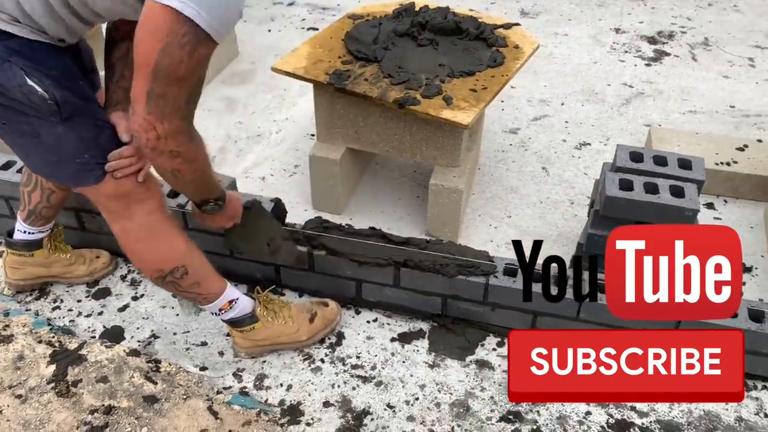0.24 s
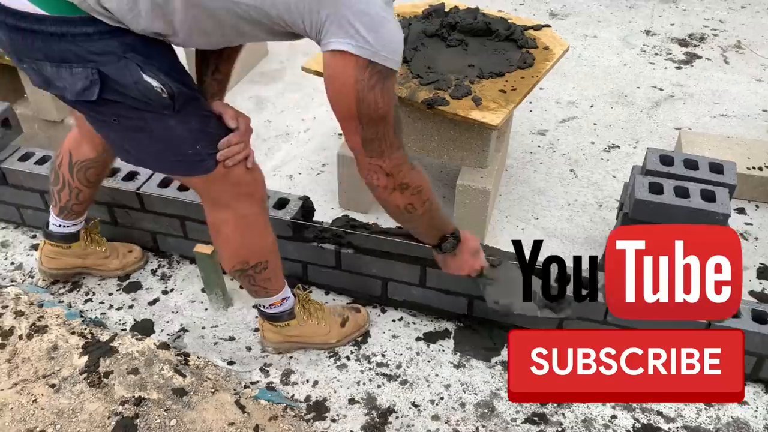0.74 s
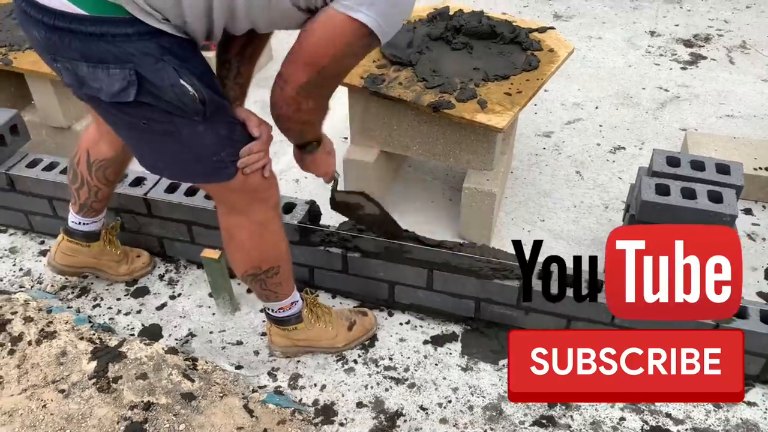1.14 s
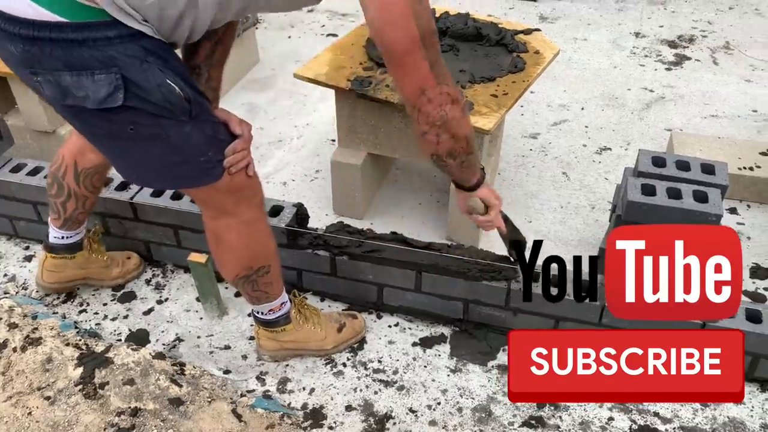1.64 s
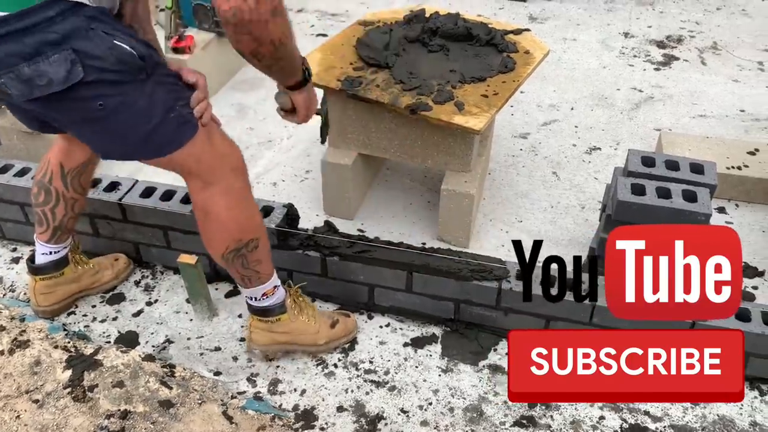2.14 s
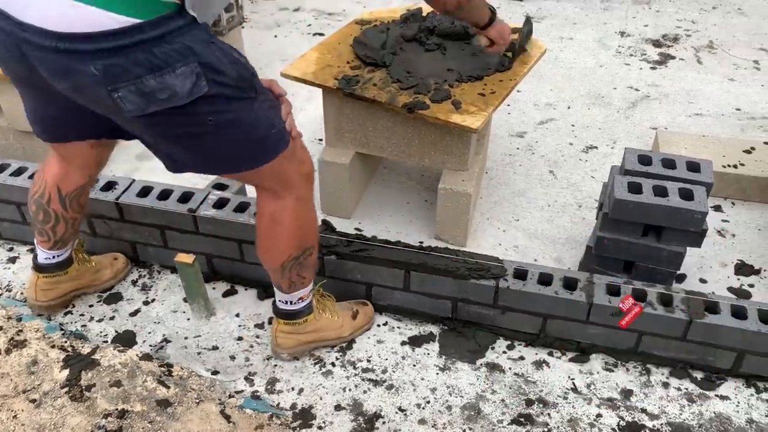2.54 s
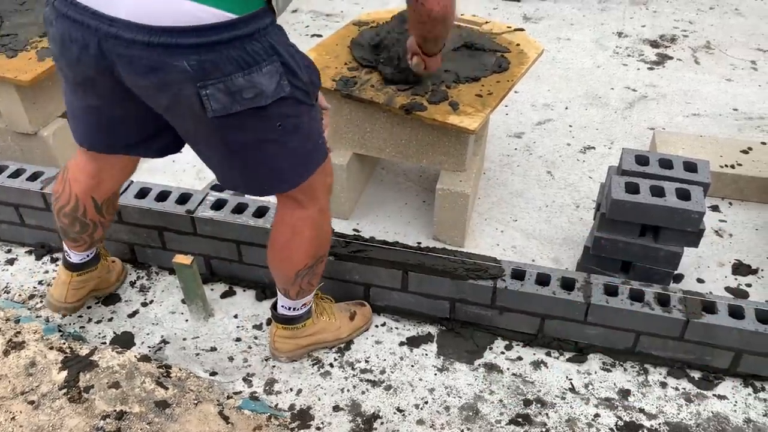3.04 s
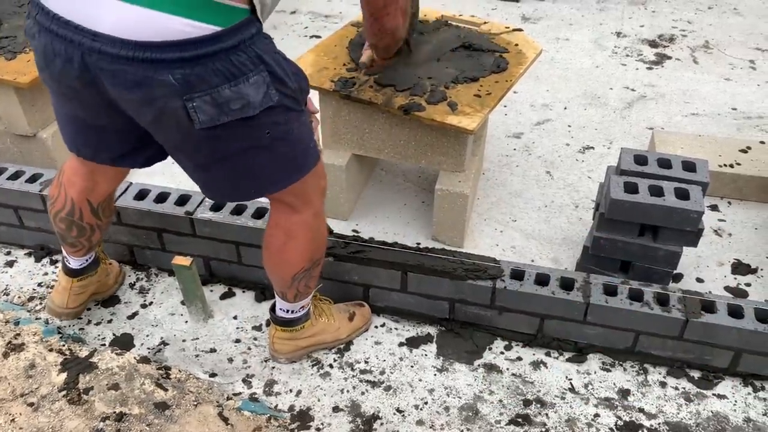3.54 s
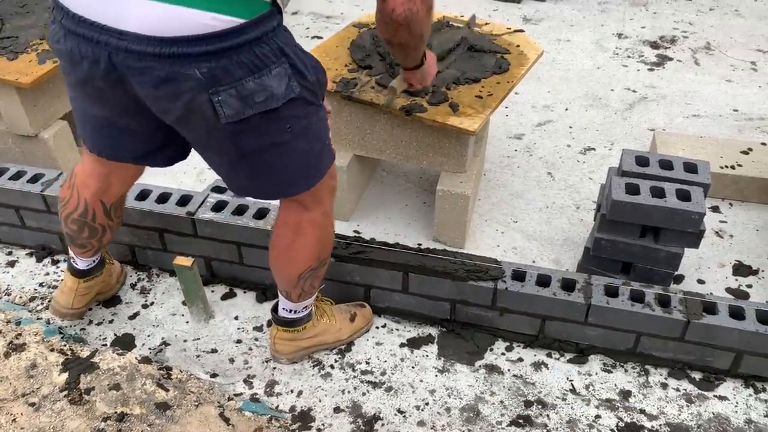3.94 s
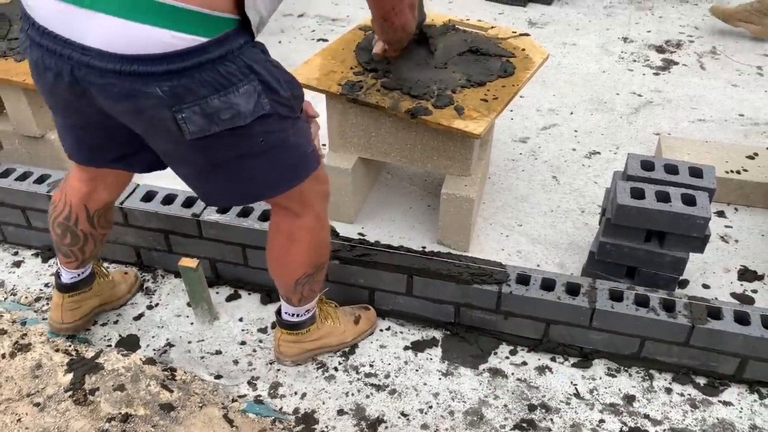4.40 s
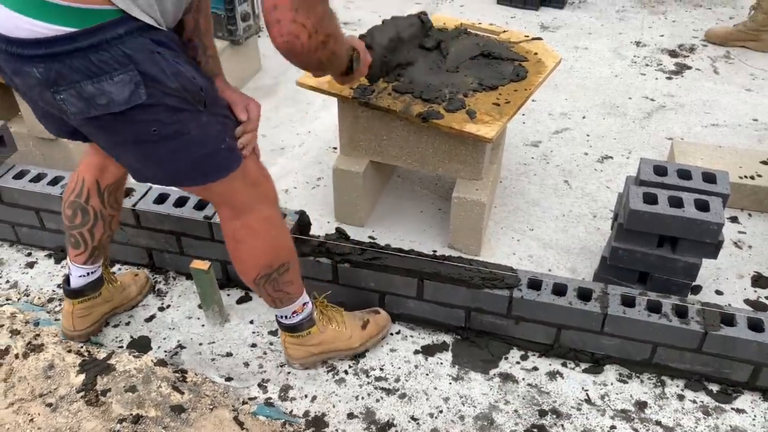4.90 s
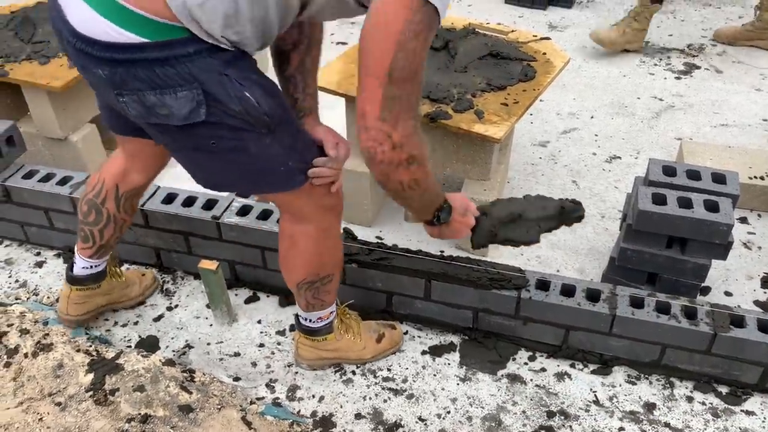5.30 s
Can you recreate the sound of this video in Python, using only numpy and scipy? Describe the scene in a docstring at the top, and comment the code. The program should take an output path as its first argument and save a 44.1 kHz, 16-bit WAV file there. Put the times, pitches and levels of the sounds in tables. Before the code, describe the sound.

A low engine hum, gently wavering, lies under soft airy noise throughout, swelling a little in the middle and easing by about 4.5 s. Faint crumb clicks open the scene. From 0.26 to 0.6 s a steel trowel spreads and drags mortar over concrete block: gritty, stuttering, ringing, with a gliding squeal and hard stony ticks. About a second of near quiet follows. At 1.56 to 1.9 s come fast, bright, harsh strokes, ending with a wet slap. At 2.5 s a hollow thud on the board begins duller turning scrapes until 2.95 s. Sharp scoops rasp and squeal at 3.2 to 3.3 s and briefly at 4.05 to 4.15 s. Between and after them are soft slides, crumb ticks and a small dull thud near 3.7 s. Late on, deep boot bumps and dropping crumbs end with a soft rub around 5.3 s. The work is close, with faint outdoor reflections.

```python
"""An engine hums on an open site throughout, as wavering tones over noise; crumbs click and soft slides rub.
From 0.26 s a bricklayer spreads and drags mortar along concrete blocks: sand grains crack under a ringing
blade, and from 0.30 s narrow and broad squeals glide during the trowel work. From 1.56 s he strikes it off;
surplus slaps down as a struck board and a splat. He turns the heap from 2.51 s and scoops at 3.19 s and 4.05 s;
each push bites in, holds and dies away. From 3.40 s boots add dull bass pulses; late on, crumbs drop."""
import sys
import numpy as np
from scipy import signal
from scipy.fft import rfft, irfft, next_fast_len
from scipy.io import wavfile
from scipy.ndimage import uniform_filter1d

SR = 44100
rng = np.random.default_rng(int(sys.argv[2]) if len(sys.argv) > 2 else 0)


def output_pcm(signal):
    """Save a mono or channel-first signal as 16-bit PCM at the path in sys.argv[1].

    Samples are clipped to [-1, 1] before scaling.
    """
    pcm = np.clip(np.atleast_2d(signal).T, -1, 1) * 32767
    wavfile.write(sys.argv[1], SR, np.round(pcm).astype(np.int16))


N = 245195
TIME = np.arange(N) / SR
BAND_EDGES_HZ = (800, 4500)   # support rumble | grinding edge | loose sand


def from_db(db):
    """Level to amplitude ratio: 20 dB is a factor of ten."""
    return 10 ** (np.asarray(db) / 20)


def rms_one(x):
    """Normalisation to unit root-mean-square."""
    return x / np.sqrt(np.mean(x ** 2) + 1e-20)


def butter(x, hz, kind, order=2):
    """Causal filtering with a maximally flat passband (Butterworth)."""
    return signal.sosfilt(signal.butter(order, hz, kind, fs=SR, output="sos"), x)


def drift(rate, size=N):
    """Random modulation: straight lines between Gaussian knots, `rate` knots a second."""
    knots = np.arange(size) / SR * rate
    return np.interp(knots, np.arange(4096), rng.standard_normal(4096))


def coloured(x, spectrum):
    """Minimum-phase filtering: the cepstrum of a (f/Hz, level/dB) curve is folded to be causal."""
    size = 2 * next_fast_len(x.shape[-1] // 2 + 2048)
    hz, db = np.transpose(spectrum)
    bins_hz = np.arange(size // 2 + 1) * SR / size
    curve_db = np.interp(np.log(bins_hz + 1), np.log(hz), db)
    cepstrum = irfft(np.log(from_db(curve_db)))
    cepstrum[1:size // 2] *= 2
    cepstrum[size // 2 + 1:] = 0
    return irfft(rfft(x, size) * np.exp(rfft(cepstrum)))[..., :x.shape[-1]]


def resonance(x, hz, width_hz):
    """Damped resonance: a two-pole band-pass, whose width sets the decay, with gain 1 on top."""
    r = np.exp(-np.pi * width_hz / SR)
    poles = [1, -2 * r * np.cos(2 * np.pi * hz / SR), r * r]
    return signal.lfilter(np.array([1, 0, -1]) * (1 - r * r) / 2, poles, x)


def burst(t60, size=8192):
    """Exponential decay: noise that falls by 60 dB in t60 seconds."""
    return rng.standard_normal(size) * from_db(-60 * TIME[:size] / t60)


def evened(x, window_s=0.06):
    """Level control: the short-term rms is held at 1 while finer grain remains."""
    return x / np.sqrt(np.abs(uniform_filter1d(x ** 2, round(window_s * SR))) + 1e-20)


def add(out, s, x):
    """Superposition: mix x into out from time s on."""
    start = round(s * SR)
    out[..., start:start + x.shape[-1]] += x[..., :N - start]


# scattering gain, weakest in the bass, with humps near 600 Hz and in the treble: (f/Hz, level/dB)
SCATTER_GAIN = [(200, -7), (600, 4), (1300, -1), (2500, 3), (5000, 2), (14000, 3)]
PATH_TURNS_PER_S = 3   # how fast the scattered paths change as the hand moves


def placed(x, pan_db, lag_ms, scatter_db, scatter_t60=0.056):
    """Inter-channel differences and scattering: lag and level differ by side; slab and blocks blur both."""
    direct = np.array([np.interp(TIME - lag_ms / 1000, TIME, x), x])
    paths = np.array([burst(scatter_t60) for _ in range(4)])
    responses = coloured(paths / np.linalg.norm(paths[0]), SCATTER_GAIN)
    heard = signal.oaconvolve(x[None], responses, axes=1)[:, :N]
    # each side turns steadily between two independent paths
    angle = 2 * np.pi * PATH_TURNS_PER_S * TIME
    scatter = heard[:2] * np.cos(angle) + heard[2:] * np.sin(angle)
    mixed = (direct + from_db(scatter_db) * scatter) / np.sqrt(1 + from_db(scatter_db) ** 2 / 2)
    return mixed * from_db([[pan_db / 2], [-pan_db / 2]])


# engine lines, levels relative to one another: (f/Hz, level/dB)
ENGINE_LINES = [(73.0, -56), (109.7, -61.5), (146, -54.5), (165.5, -56), (200, -59.5), (219.0, -51.5),
                (274, -62.5), (292, -60.5), (310.7, -60.5), (346.5, -64.5), (383.3, -69), (547.5, -68.5)]
# the engine takes up load, then eases off; levels count relative to their median: (t/s, level/dB)
ENGINE_LOAD = [(0, -55), (0.6, -52), (1.7, -49.5), (3.0, -49), (4.0, -52), (4.5, -56), (5.56, -55)]
# shape of the broad rumble's spectrum: (f/Hz, relative level/dB per Hz)
SITE_SPECTRUM = [(15, -51.5), (25, -27), (59, -1), (95, -6), (150, -6.5), (219, -12), (250, -14.5),
                 (354, -18.5), (462, -25), (543, -25.5), (673, -26), (1500, -32.5), (2300, -37.5),
                 (4500, -41.5), (10600, -53.5), (14000, -61), (15000, -89.5)]
# side signal relative to mid: (f/Hz, level/dB)
SIDE_TO_MID = [(60, -14.5), (250, -4), (700, 0.5), (3000, -2), (12000, 0.5)]


def site(hum_db=-3.0, noise_db=-50.0, waver_hz=0.25, flutter_db=1.24, pan_db=-.9):
    """Additive synthesis with frequency and amplitude modulation: engine lines over diffuse noise."""
    s, level_db = np.transpose(ENGINE_LOAD)
    load = from_db(np.interp(TIME, s, level_db - np.median(level_db)))
    hum = np.zeros(N)
    for hz, db in ENGINE_LINES:
        amplitude = np.sqrt(2) * from_db(db + flutter_db * drift(24))
        phase = 2 * np.pi * np.cumsum(hz + waver_hz * drift(7.6)) / SR
        hum += amplitude * np.sin(phase)
    mid, side = rms_one(coloured(rng.standard_normal((2, N)), SITE_SPECTRUM))
    air = from_db(noise_db) * (mid + coloured(side, SIDE_TO_MID) * [[1], [-1]])
    # only the dull roar within the noise follows the load
    roar = butter(air, [150, 800], "band", order=1)
    sound = air + (load - 1) * roar + load * from_db(hum_db) * hum
    return sound * from_db(np.array([[1], [-1]]) * pan_db)


CARRY_S = (4.78, 4.95)   # smaller crumbs fall at random while the loaded trowel is lifted
SPILL_DB, SPILL_SPREAD_DB, SPILL_HZ = -47, 2.5, (888, 2990)   # peak, its spread, range of centres


def spill(count=3):
    """Random arrivals: crumbs off the loaded trowel, as rows (t/s, peak level/dB, f/Hz)."""
    return [(rng.uniform(*CARRY_S), rng.normal(SPILL_DB, SPILL_SPREAD_DB), rng.uniform(*SPILL_HZ))
            for _ in range(count)]


# clear crumbs that drop and smacks of wet mortar, before placing: (t/s, peak level/dB, centre f/Hz)
CLEAR_CRUMBS = [(0.031, -45, 4500), (0.101, -38, 1970), (2.194, -44, 3500), (2.283, -43.5, 1504),
                (2.491, -40, 2990), (2.789, -29.5, 1800), (3.697, -30, 1640), (4.302, -44.5, 1169),
                (4.491, -34.5, 1420), (4.547, -44, 1700), (4.566, -39.5, 4650), (4.785, -39.5, 3160),
                (4.824, -41, 1950), (4.832, -40.5, 3500), (4.908, -41.5, 2000), (4.938, -49, 1500),
                (5.085, -44, 900), (5.169, -48, 1170), (5.261, -40, 600), (5.281, -34.5, 1300)]
# spectrum of the bare click: (f/Hz, relative level/dB per Hz)
CLICK_SPECTRUM = [(300, -17.5), (700, -3), (2000, -11), (4000, -13.5), (9000, -17.5), (14000, -22.5)]


def crumbs(t60=0.014, ring_db=12, width_share=0.64):
    """Impulse exciting a resonance: a click pitched by the size of the crumb or air pocket."""
    out = np.zeros(N)
    for s, db, hz in CLEAR_CRUMBS + spill():
        click = coloured(burst(t60), CLICK_SPECTRUM)
        click = click + from_db(ring_db) * resonance(click, hz, width_share * hz)
        add(out, s, from_db(db) * click / np.abs(click).max())
    return out


# blade resonances, level over the plain excitation: (f/Hz, width f/Hz, level/dB)
BLADE_MODES = [(841, 17.6, 0), (1069, 120, 1), (1488, 20, -4), (1645, 50, -6.5), (1710, 170, -9),
               (2075, 200, -10), (2490, 42, -7.5), (2890, 17, -9), (3680, 460, -10), (6210, 360, -4),
               (8300, 660, -8)]


def blade(x):
    """Modal resonance: steel damped by mortar rings briefly on top of whatever drives it."""
    return x + sum(from_db(db) * resonance(x, hz, width_hz) for hz, width_hz, db in BLADE_MODES)


def travelling(x, delay_ms=0.902, wander_ms=0.23, wanders_per_s=22, reflection=0.53):
    """Comb interference: waves return from the blade's far edge; the contact moves, so the bands shift."""
    t = TIME[:len(x)]
    delay_s = np.maximum(delay_ms + wander_ms * drift(wanders_per_s, len(x)), 0) / 1000
    return x + reflection * np.interp(t - delay_s, t, butter(x, BAND_EDGES_HZ[0], "high"))


def stick_slip(size, slips_per_s, depth_db, slip_s, uneven_db=2.1):
    """Stick-slip friction: the edge sticks, then lets go in a sharp fading rasp, at uneven intervals."""
    intervals = rng.uniform(.5, 1.5, 200)
    starts = np.concatenate([[0], np.cumsum(intervals)]) / slips_per_s
    strengths = from_db(depth_db + uneven_db * np.clip(rng.standard_normal(201), -1.5, 1.5))
    latest = np.searchsorted(starts, TIME[:size], "right") - 1
    return 1 + strengths[latest] * np.exp(-(TIME[:size] - starts[latest]) / slip_s)


def scrape(start, pressure_db, levels_db, colour, grains_per_s, judder_db, slips_per_s, slip_s,
           grain_spread_db=2.5, flicker_db=0.5):
    """Granular friction: sand cracks in stick-slip clumps; pressure drives all three bands together."""
    size = len(pressure_db)
    chance, sizes = rng.random(N)[:size], rng.exponential(1, N)[:size]
    sand = rng.standard_normal(N)[:size]
    strengths = from_db(grain_spread_db * np.minimum(sizes, 2))
    grains = (chance < grains_per_s / SR) * np.sign(sand) * strengths
    rasp = (rms_one(grains) + 0.3 * sand) * stick_slip(size, slips_per_s, judder_db, slip_s)
    body = blade(travelling(coloured(rasp, colour)))
    # the support rumbles, the edge grinds, loose sand hisses
    bands = (butter(body, BAND_EDGES_HZ[0], "low", order=4),
             butter(body, BAND_EDGES_HZ, "band", order=4),
             butter(body, BAND_EDGES_HZ[1], "high", order=5))
    sound = np.zeros(size)
    for band, db in zip(bands, levels_db):
        flickering = band * from_db(flicker_db * drift(200, size))
        sound += evened(flickering) * from_db(db + pressure_db)
    out = np.zeros(N)
    add(out, start, sound * signal.windows.tukey(size, .02))
    return out


# slides of mortar and boot soles, levels at full swell before placing:
# (loudest at t/s, rise t/s, fall t/s, grinding level/dB, sandy hiss level/dB)
SOFT_SLIDES = [(0.041, 0.02, 0.12, -60, -54.5), (0.78, 0.095, 0.18, -73, -74),
               (1.155, 0.055, 0.084, -64, -61), (2.285, .012, 0.093, -60.5, -71),
               (2.99, 0.037, 0.093, -64.5, -62), (3.40, 0.062, 0.15, -60, -65),
               (3.715, 0.045, 0.11, -53, -56.5), (4.21, 0.056, 0.15, -56, -55.5),
               (4.31, .04, 0.15, -60, -61.5), (4.54, .1, 0.1, -58.5, -63),
               (4.915, 0.021, 0.075, -59.5, -73), (5.22, 0.23, 0.34, -63, -62),
               (5.31, 0.05, 0.16, -46.5, -55)]
# spectrum of the rubbing: (f/Hz, relative level/dB per Hz)
SLIDING_SPECTRUM = [(280, -11), (470, 2), (700, -5.5), (1150, -7.5), (1500, -7), (2590, -7.5),
                    (3600, -14.5), (5000, -22), (6200, -21.5), (7400, -28.5), (8100, -18.5), (9000, -19),
                    (14000, -36), (15000, -51)]


def slides(range_db=21, rumble_db=-2.5):
    """Light granular friction: sparse grains swell and fade; rumble_db is relative to the grinding."""
    out = np.zeros(N)
    for s, rise_s, fall_s, grinding_db, hiss_db in SOFT_SLIDES:
        length_s = rise_s + fall_s
        swell_db = np.interp(TIME[:round(length_s * SR)], [0, rise_s, length_s], [-range_db, 0, -range_db])
        levels_db = grinding_db + rumble_db, grinding_db, hiss_db
        out += scrape(max(s - rise_s, 0), swell_db, levels_db, SLIDING_SPECTRUM,
                      grains_per_s=400, judder_db=-0.5, slips_per_s=60, slip_s=0.0021)
    return out


BITE_DB = 10   # a push starts this far under its full level
RELEASE_DEPTH_DB = 36   # fall over which the release is played out


def push(length_s, attack_s, release_db_per_s, unsteady_db=1.33, unsteady_per_s=45):
    """Attack, hold and release of pressure in dB: the blade bites in, rides the lumps and lifts off."""
    t = TIME[:round((length_s + RELEASE_DEPTH_DB / release_db_per_s) * SR)]
    bite_db = -BITE_DB * np.maximum(1 - t / attack_s, 0)
    release_db = -release_db_per_s * np.maximum(t - length_s, 0)
    return bite_db + release_db + unsteady_db * drift(unsteady_per_s, len(t))


def taps(rows, colour, t60):
    """Impact excitation: short cracks ring the blade; nominal peak is three times the early rms."""
    out = np.zeros(N)
    for s, db in rows:
        crack = blade(coloured(burst(t60), colour))
        early_rms = crack[:130].std()   # first 3 ms
        add(out, s, from_db(db) * crack / (3 * early_rms))
    return out


# pushes of the trowel, levels at full pressure before placing: (task, start t/s, release t/s,
# time to full pressure t/s, rumble of block or board level/dB, grinding level/dB, sandy hiss level/dB)
PUSHES = [ ("spread", 0.264, 0.326, 0.055, -46, -36, -42), ("spread", 0.326, 0.451, 0.031, -43, -30, -36.5),
          ("drag", 0.449, 0.592, 0.0056, -40.5, -31, -37),
          ("strike off", 1.557, 1.555, 0.0028, -42.5, -34, -38.5),
          ("strike off", 1.594, 1.606, .008, -44.5, -33, -34.5),
          ("strike off", 1.612, 1.637, 0.012, -44.5, -27, -28),
          ("strike off", 1.650, 1.710, 0.012, -44.5, -27, -26.5),
          ("strike off", 1.719, 1.757, 0.0044, -41.5, -26.5, -28),
          ("strike off", 1.791, 1.835, 0.0025, -35.5, -28, -24.5),
          ("strike off", 1.842, 1.8674, 0.0047, -34.5, -30, -29),
          ("strike off", 1.897, 1.902, 0.0013, -39.5, -43.5, -47),
          ("turn", 2.510, 2.575, 0.0061, -34.5, -38.5, -41.5),
          ("turn", 2.590, 2.635, 0.01, -43.5, -34, -39), ("turn", 2.655, 2.785, 0.0066, -55, -45, -53),
          ("turn", 2.786, 2.805, 0.00286, -44, -43.5, -64), ("turn", 2.810, 2.872, 0.061, -41, -37.5, -50),
          ("turn", 2.880, 2.926, 0.0036, -44, -46.5, -51), ("scoop", 3.191, 3.3105, 0.032, -38.5, -28, -32),
          ("scoop", 4.047, 4.068, 0.0026, -37.5, -28.5, -36),
          ("scoop", 4.072, 4.090, 0.0081, -46.5, -21, -23),
          ("scoop", 4.096, 4.120, 0.0078, -41, -26.5, -32.5),
          ("scoop", 4.121, 4.152, 0.0063, -40, -25, -30), ]
# the edge lands or catches hard on a stone, before placing: (t/s, nominal peak level/dB)
STONE_CATCHES = [(0.262, -19), (0.290, -20), (0.306, -20), (0.311, -22), (0.373, -16), (0.455, -14),
                 (0.469, -11.5), (0.490, -8), (0.502, -12.5), (0.509, -10), (0.525, -14.5), (0.533, -16),
                 (0.550, -18), (0.558, -9.5), (0.593, -15), (1.558, -24.5), (1.602, -17.5), (1.624, -18),
                 (1.632, -15), (1.649, -16.5), (1.668, -14), (1.727, -12), (1.752, -11), (1.763, -11.5),
                 (1.792, -10), (1.799, -12.5), (1.828, -12), (1.897, -14), (2.509, -12), (3.232, -13),
                 (3.298, -15.5), (3.314, -24), (4.049, -10), (4.078, -12), (4.085, -14.5)]


def stroke(task, colour, grains_per_s, judder_db, slips_per_s, slip_s, release_db_per_s,
           pan_db, lag_ms, scatter_db):
    """Friction and impact together: the pushes of one task, with the catches that fall among them."""
    rows = [row[1:] for row in PUSHES if row[0] == task]
    grinding = np.zeros(N)
    for start, end, attack_s, *levels_db in rows:
        pressure_db = push(end - start, attack_s, release_db_per_s)
        grinding += scrape(start, pressure_db, levels_db, colour, grains_per_s, judder_db, slips_per_s, slip_s)
    first_s, last_s = rows[0][0] - .004, rows[-1][1] + .004
    inside = [row for row in STONE_CATCHES if first_s < row[0] < last_s]
    catches = taps(inside, colour, t60=0.021)
    return placed(grinding, pan_db, lag_ms, scatter_db) + placed(catches, pan_db, lag_ms, scatter_db=-6.5)


# blade spreading on block: (f/Hz, relative level/dB per Hz)
SPREADING_SPECTRUM = [(120, -42), (200, -11), (400, -10.5), (630, -17.5), (850, -6), (1050, -4),
                      (1300, -9.5), (1600, 1.5), (2150, -1.5), (2800, -3.5), (3120, -9), (3900, -6),
                      (5390, -15.5), (6300, -16.5), (9480, -12.5), (14200, -24), (15500, -58)]


def spreading():
    """Stick-slip friction on the course of blocks, with a fast release."""
    return stroke("spread", SPREADING_SPECTRUM, grains_per_s=2000, judder_db=5.0, slips_per_s=150,
                  slip_s=0.0016, release_db_per_s=1093, pan_db=-1.5, lag_ms=0.028, scatter_db=-1.0)


# friction locks onto one resonance for a moment, levels before placing:
# (start t/s, end t/s, first f/Hz, last f/Hz, width f/Hz, rms level/dB)
SQUEAL_GLIDES = [(0.301, 0.417, 1130, 1017, 11.5, -36.5), (0.385, 0.473, 1018, 968, 25, -39.5),
                 (0.35, 0.402, 2150, 2055, 780, -37), (0.490, 0.578, 1680, 1610, 200, -33.5),
                 (1.656, 1.742, 1178, 1076, 130, -43), (1.704, 1.715, 1136, 1120, 71, -28.5),
                 (1.785, 1.86, 719, 820, 322, -31), (2.598, 2.64, 1019, 1072, 216, -44),
                 (2.780, 2.87, 2460, 2404, 110, -50), (3.23, 3.241, 3600, 3520, 304, -28),
                 (3.237, 3.283, 1603, 2303, 324, -30.5), (3.268, 3.32, 3640, 3560, 790, -28),
                 (4.073, 4.09, 3480, 3680, 900, -25.5), (4.090, 4.133, 1796, 1547, 600, -29),
                 (4.127, 4.156, 3650, 3710, 640, -29.5), (4.140, 4.168, 2550, 2320, 290, -35.5)]


def squeals():
    """Friction-driven resonance: a rough, narrow or broad ring glides as the contact moves along the blade."""
    out = np.zeros(N)
    for start, end, first_hz, last_hz, width_hz, db in SQUEAL_GLIDES:
        size = max(round((end - start) * SR), 64)
        phase = 2 * np.pi * np.cumsum(np.geomspace(first_hz, last_hz, size)) / SR
        # two random quadrature parts make a band of noise around the gliding tone
        ring = drift(width_hz, size) * np.cos(phase) + drift(width_hz, size) * np.sin(phase)
        ring = evened(ring, window_s=0.0066)
        add(out, start, from_db(db) * rms_one(ring * signal.windows.tukey(size, .7)))
    return out


# blade dragged on block: (f/Hz, relative level/dB per Hz)
DRAGGING_SPECTRUM = [(120, -33), (200, -12), (400, -5.5), (520, -6.5), (630, -21), (812, -1.5),
                     (1030, -3.5), (1300, -8), (1560, 6), (2060, 4), (2500, -4.5), (3100, -11), (3900, -8),
                     (5390, -19), (9480, -15.5), (14200, -25), (15500, -60)]


def dragging():
    """Stick-slip friction with fewer, deeper slips than spreading."""
    return stroke("drag", DRAGGING_SPECTRUM, grains_per_s=2000, judder_db=9.5, slips_per_s=105,
                  slip_s=0.0023, release_db_per_s=1093, pan_db=-1.0, lag_ms=0.031, scatter_db=-2.0)


# blade striking off the course: (f/Hz, relative level/dB per Hz)
STRIKING_OFF_SPECTRUM = [(88, -52.5), (150, -15), (217, 9), (509, -7.5), (844, -2.5), (985, -5.5),
                         (1090, -4), (1400, -8.5), (1700, -2), (2230, -8), (3830, -7), (5030, -13.5),
                         (6100, -3.5), (7000, -4.5), (9360, 2), (13500, -8), (15500, -34)]


def striking_off():
    """Strong stick-slip friction: the deepest judder of all the tasks."""
    return stroke("strike off", STRIKING_OFF_SPECTRUM, grains_per_s=4000, judder_db=15.5, slips_per_s=125,
                  slip_s=0.0033, release_db_per_s=520.0, pan_db=-1.5, lag_ms=0.024, scatter_db=-5.0)


# wet mortar lands, levels before placing:
# (t/s, thud peak level/dB, lowest ring f/Hz, contact t/ms, splat level/dB relative to the thud)
MORTAR_SLAPS = [(1.766, -23.5, 213, 2.6, 3), (2.509, -13, 166, 1.23, -3), (3.699, -25, 126, 6, -26),
                (3.716, -24.5, 194, 3.4, -25)]
# modes of what it lands on: (ratio to the lowest ring, level/dB, t60 t/s)
BOARD_MODES = [(1, -1, 0.066), (1.45, -2, 0.069), (1.95, 7, 0.045), (2.6, -1, .04)]


def slaps(splat_t60=0.04, splat_hz=1300):
    """Impact of a soft mass on a modal body: longer contact, duller thud; the lump also splatters."""
    out, t = np.zeros(N), TIME[:8192]
    for s, db, hz, contact_ms, splat_db in MORTAR_SLAPS:
        ring = sum(from_db(mode_db - 60 * t / t60) * np.sin(2 * np.pi * hz * ratio * t)
                   for ratio, mode_db, t60 in BOARD_MODES)
        force = np.sin(np.pi * np.minimum(1000 * t / contact_ms, 1))   # half-sine contact
        thud = butter(signal.fftconvolve(ring, force)[:len(t)], 140, "high")
        splat = butter(burst(splat_t60), [600, splat_hz], "band")
        thud = thud / np.abs(thud).max()
        splat = from_db(splat_db) * splat / np.abs(splat).max()
        add(out, s, from_db(db) * (thud + splat))
    return out


# blade turning the heap on the board: (f/Hz, relative level/dB per Hz)
TURNING_SPECTRUM = [(88, -21), (150, 9), (308, 9), (440, 3.5), (620, -4.5), (1020, -9), (1400, -9.5),
                    (1750, -8), (2400, -10), (3300, -14.5), (5230, -21.5), (8660, -19), (10700, -19),
                    (13500, -29), (15500, -59)]


def turning():
    """Granular friction with shallow stick-slip and the slowest release."""
    return stroke("turn", TURNING_SPECTRUM, grains_per_s=3000, judder_db=-6, slips_per_s=110,
                  slip_s=0.0046, release_db_per_s=383, pan_db=-1.5, lag_ms=0.031, scatter_db=-2.5)


# blade scooping on the board: (f/Hz, relative level/dB per Hz)
SCOOPING_SPECTRUM = [(76, -56.5), (130, -16.5), (307, 0), (571, -14), (780, -12.5), (1110, -8), (1380, -6),
                     (1720, -2.5), (2400, -2), (2950, -5.5), (3670, -6.5), (5200, -13.5), (6500, -12),
                     (7500, -16), (9030, -14), (11000, -20), (13200, -17.5), (14600, -41), (15500, -80)]


def scooping():
    """Granular friction with the densest grains and the most frequent slips."""
    return stroke("scoop", SCOOPING_SPECTRUM, grains_per_s=5000, judder_db=-2.0, slips_per_s=200,
                  slip_s=.002, release_db_per_s=755.0, pan_db=-1.8, lag_ms=0.02, scatter_db=-5.5)


# dull bumps as he shifts his weight, before the high-pass: (t/s, nominal peak level/dB)
WEIGHT_SHIFTS = [(3.402, -34), (3.47, -36), (4.488, -36.5), (4.692, -31), (5.167, -30.5), (5.204, -29),
                 (5.282, -30.5)]


def bumps(bump_hz=58, swell_s=0.0039):
    """Heavily damped low-frequency oscillation: a brief pulse of deep bass, high-passed."""
    out, t = np.zeros(N), TIME[:8192]
    for s, db in WEIGHT_SHIFTS:
        envelope = t / swell_s * np.exp(1 - t / swell_s)
        add(out, s, from_db(db) * np.sin(2 * np.pi * bump_hz * t) * envelope)
    return butter(out, 39, "high")


# colour of the tail returned by the site: (f/Hz, level/dB)
ECHO_GAIN = [(100, -17.5), (500, -13), (1200, -18), (2000, -20.5), (3700, -18.5), (6000, -15), (9000, -16),
             (14000, -30)]


def surroundings(x, t60=0.31):
    """Reverberation: a faint, exponentially decaying tail comes back from the walls around the site."""
    paths = np.array([burst(t60, size=SR), burst(t60, size=SR)])
    responses = coloured(paths / np.linalg.norm(paths[0]), ECHO_GAIN)
    return signal.fftconvolve(x, responses, axes=1)[:, :N]


def scene():
    """Superposition: trowel work and small sounds with their reverberation, bass bumps and the site."""
    work = placed(crumbs(), pan_db=-1, lag_ms=.015, scatter_db=-5)
    work += placed(slides(), pan_db=0.0, lag_ms=0.0058, scatter_db=1.0)
    work += spreading() + dragging() + striking_off() + turning() + scooping()
    work += placed(squeals() + slaps(), pan_db=-2.5, lag_ms=0.03, scatter_db=-8.5)
    return site() + work + surroundings(work) + bumps()


def record(dry):
    """Transducer response and saturation: a narrow treble dip, rounded peaks and a steep top cut."""
    ceiling = .6
    heard = dry - resonance(dry, hz=11590, width_hz=900)
    return butter(ceiling * np.tanh(heard / ceiling), 15600, "low", order=20)


dry = scene()
out = record(dry)
output_pcm(out)
```